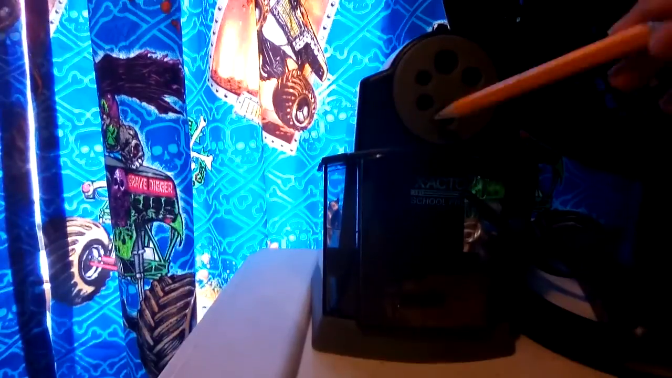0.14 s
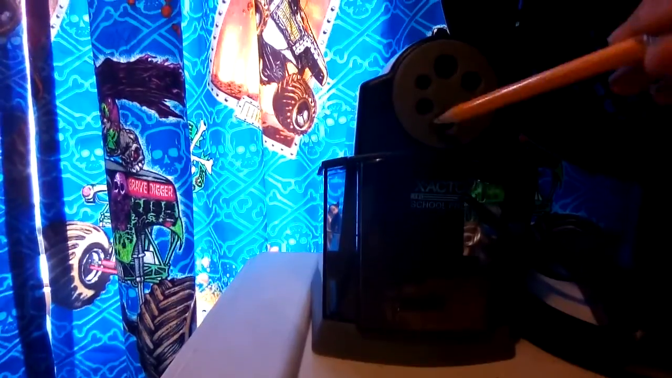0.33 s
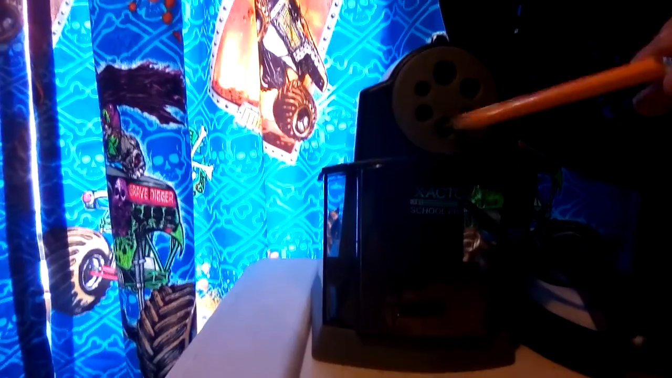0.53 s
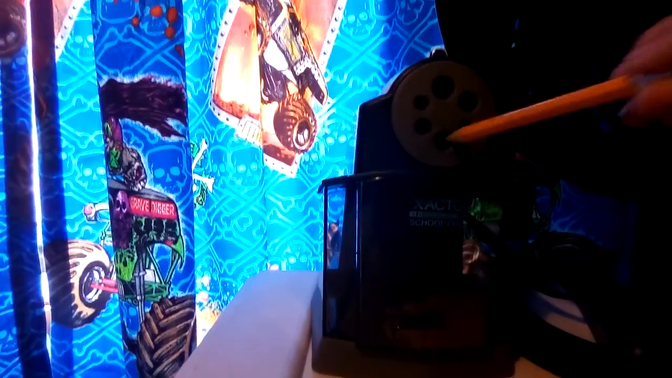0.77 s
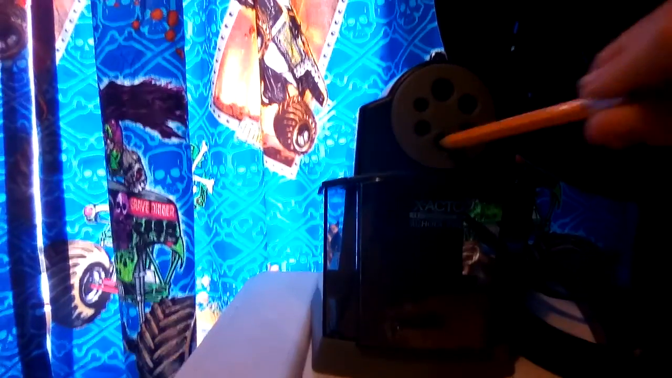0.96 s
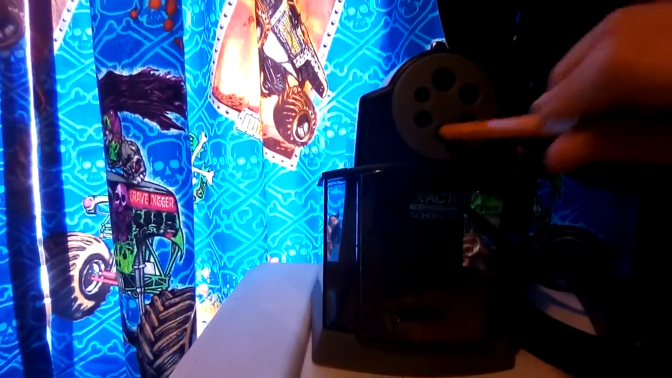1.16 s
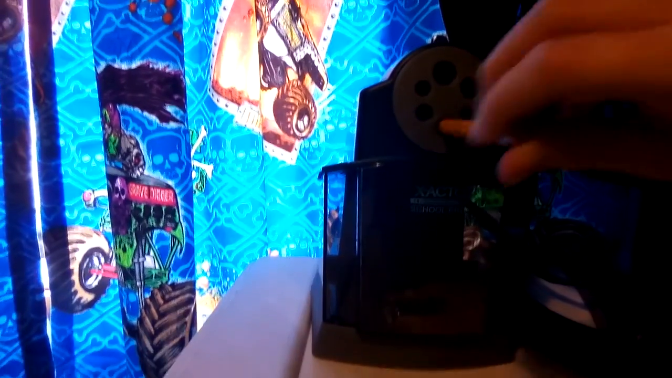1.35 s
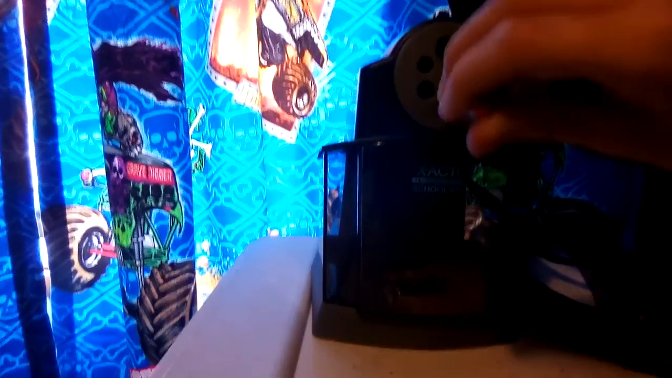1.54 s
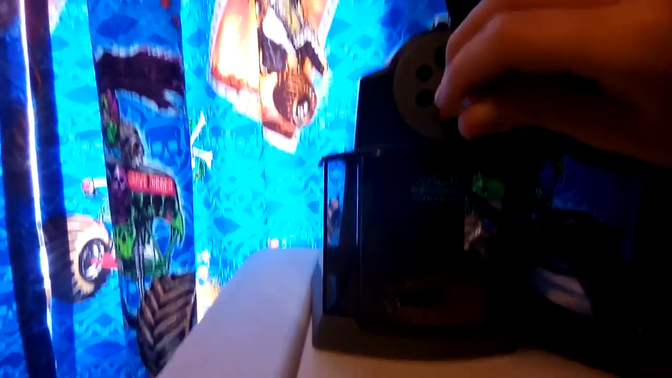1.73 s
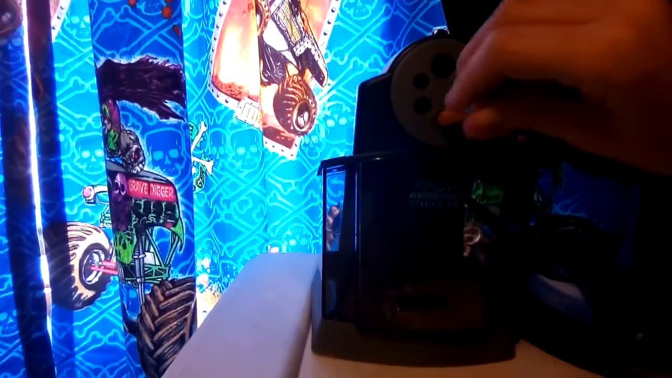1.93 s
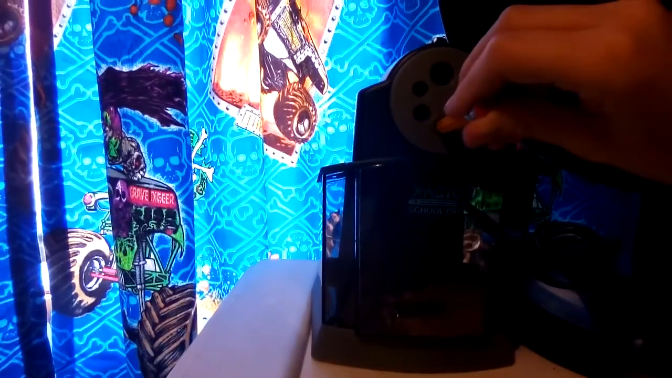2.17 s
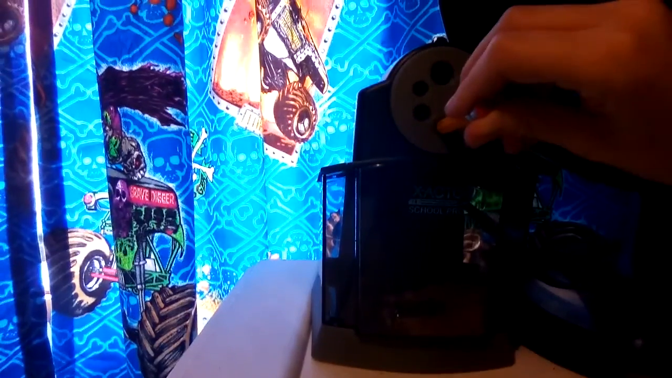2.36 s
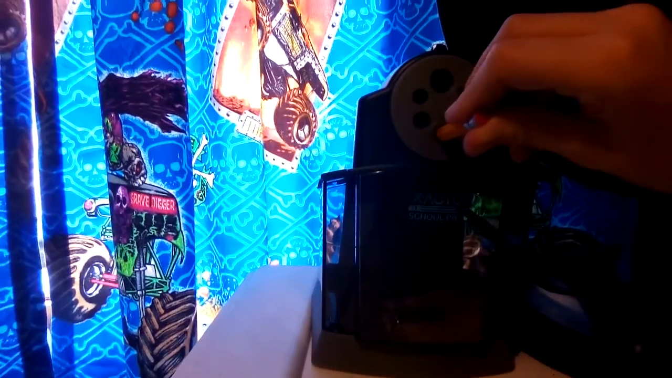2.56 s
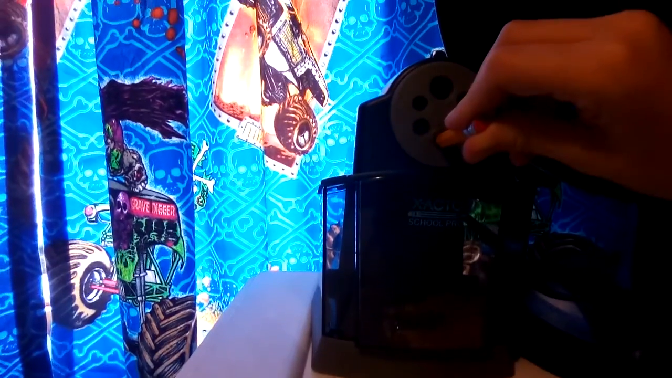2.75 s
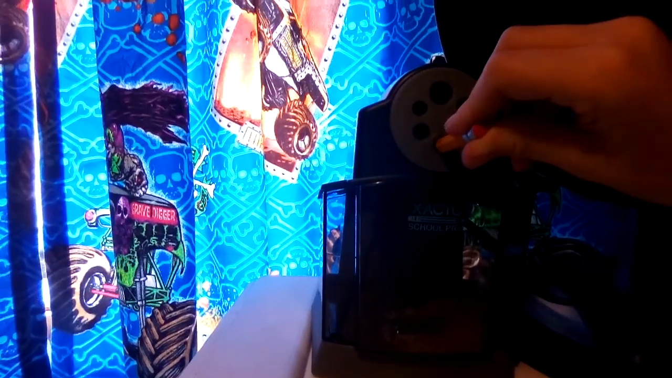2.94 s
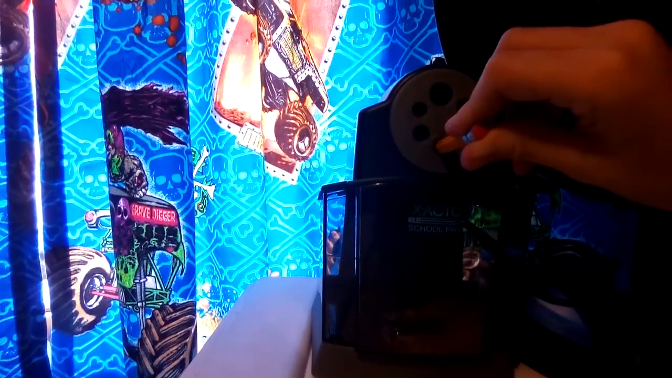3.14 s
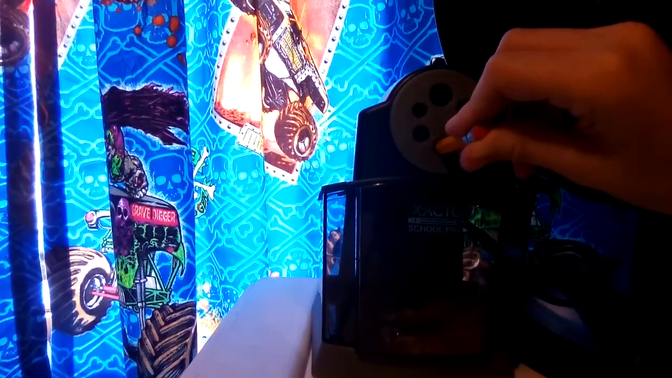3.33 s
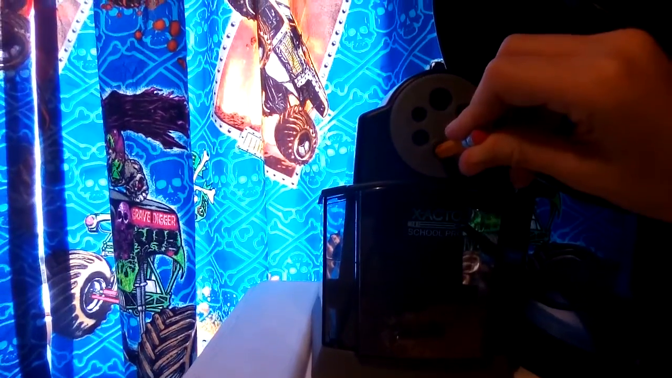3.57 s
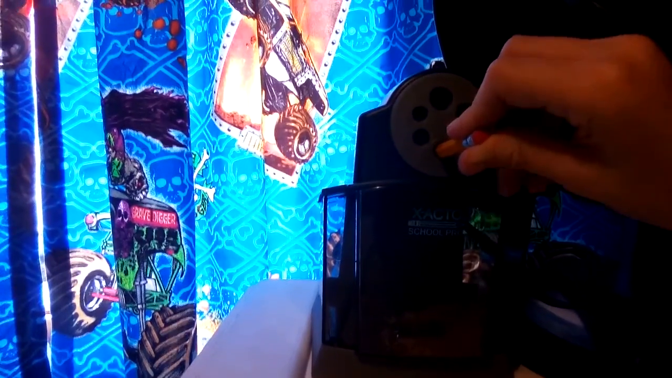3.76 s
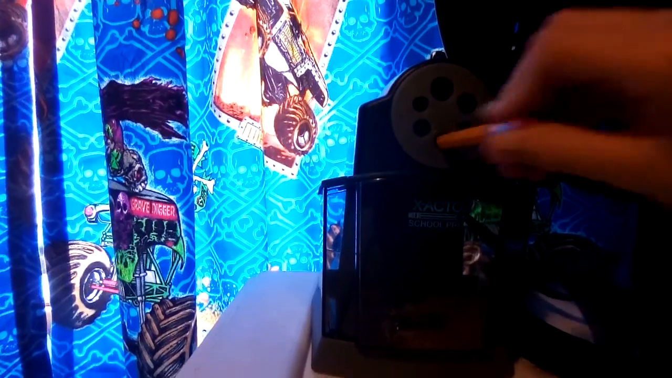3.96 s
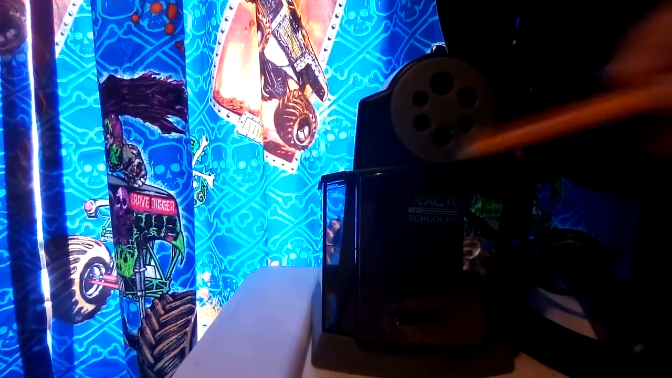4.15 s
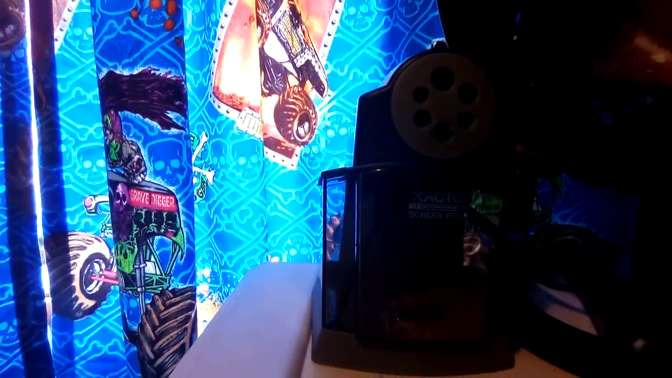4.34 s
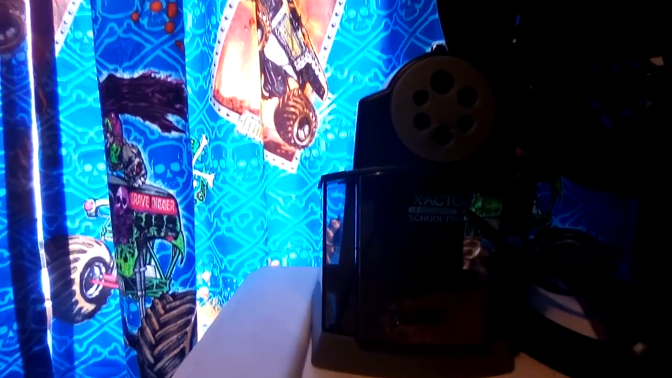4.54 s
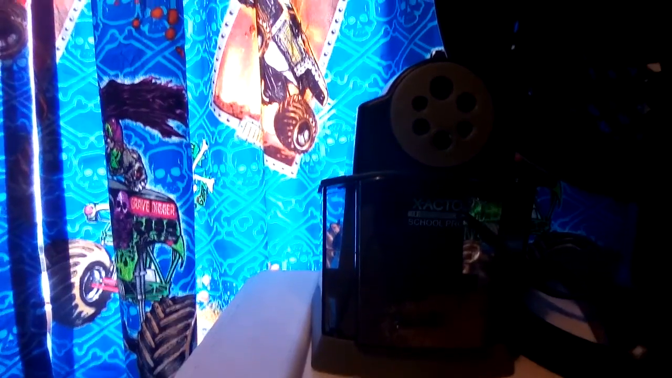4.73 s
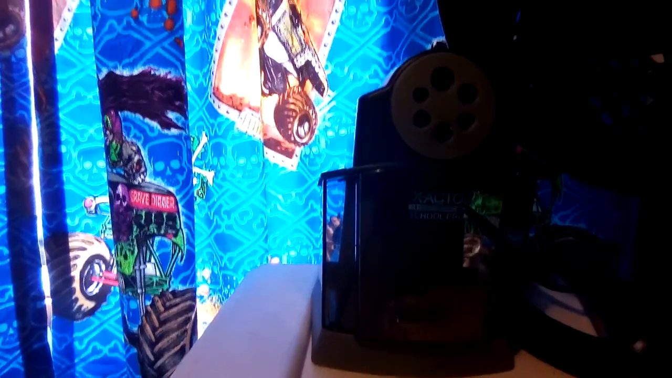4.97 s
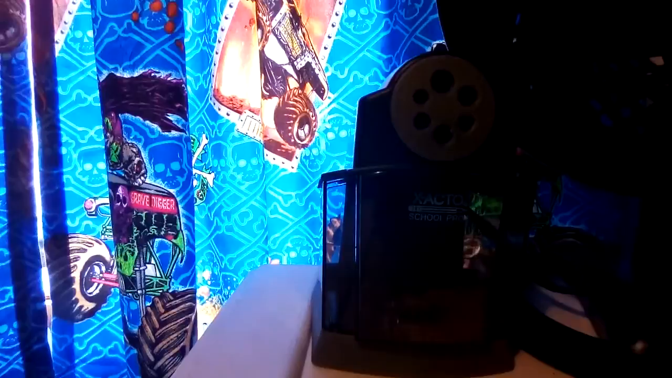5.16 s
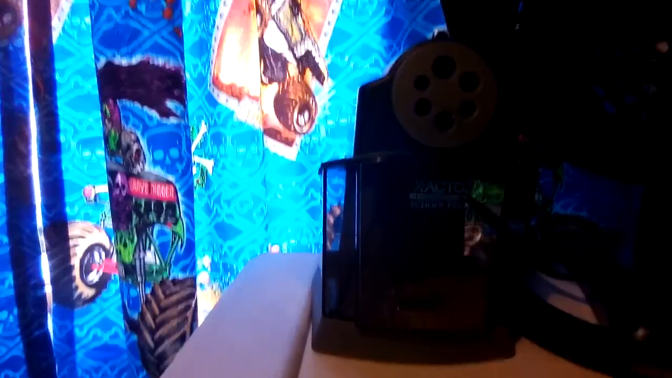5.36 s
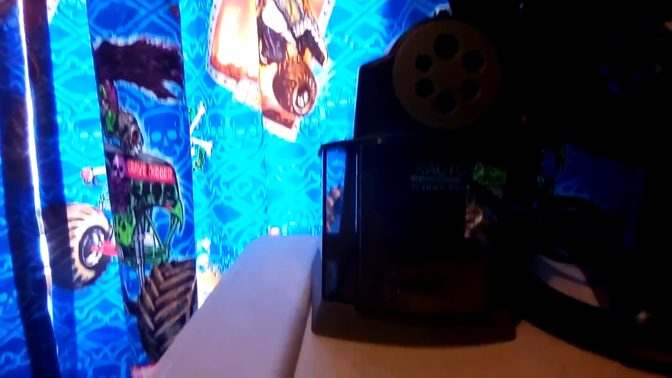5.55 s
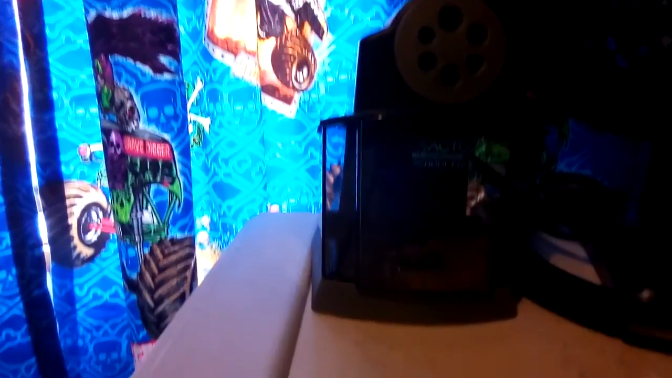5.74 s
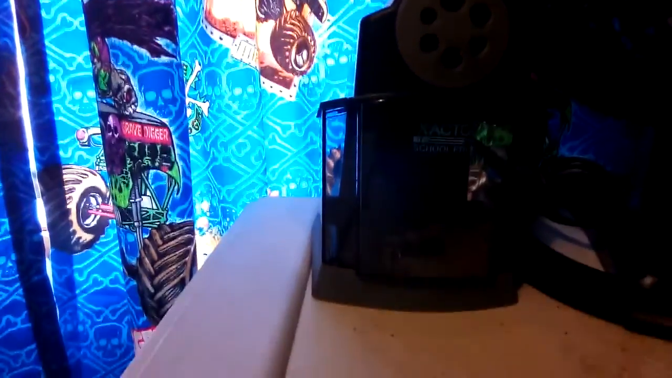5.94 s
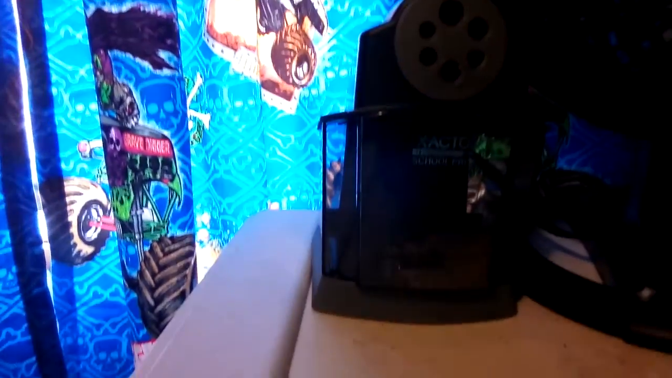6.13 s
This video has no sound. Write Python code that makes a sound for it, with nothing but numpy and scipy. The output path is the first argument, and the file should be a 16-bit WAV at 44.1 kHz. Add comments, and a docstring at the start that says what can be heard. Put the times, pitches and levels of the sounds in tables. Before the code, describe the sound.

In a small quiet room, close to a slightly dull microphone, a pencil knocks hard plastic at once, scuffs softly, then taps again around 0.3 to 0.5 seconds, ending with a sharp bright snap. A faint hoarse squeak rises near 0.65, followed by a tiny chirp and dull knocks by 0.9. Dry rubbing comes at 1.2 to 1.4, then the pencil slides in and a switch clicks at 1.75. The electric sharpener bursts into hum, rattle and hissing wood shaving, with crunchy surging bites until about 2.4. It then runs lighter, a buzzing grind throbbing about eight times a second. Scrapes at 3.7 to 4.0 mark the pencil leaving. Power cuts at 4.0; hollow gear clunks and low rumble coast down, slowing and weakening. A heavier knock lands at 5.4, and a small click and knock at 6.1.

```python
"""Close to a small microphone in a small quiet room, a pencil taps an electric sharpener's plastic face.
Filtered bursts make the taps; coloured grains and tones make the pencil rub, squeak and chirp. It slides in
and trips the switch: hum tones throb, random gear contacts ring the housing, the cutter digs and shaves.
The point scrapes the cutter as it leaves; the power drops and the clunking gears coast almost to rest."""
import sys
import numpy as np
from scipy import signal
from scipy.fft import rfft, irfft
from scipy.io import wavfile
from scipy.ndimage import uniform_filter1d

SR = 44100
rng = np.random.default_rng(int(sys.argv[2]) if len(sys.argv) > 2 else 0)


def file_out(sig):
    """Save sig as 16-bit WAV at sys.argv[1]."""
    # one column per channel
    cols = np.atleast_2d(sig).T
    # limit, then scale
    lim = np.clip(cols, -1, 1)
    pcm = np.round(lim * 32767).astype(np.int16)
    wavfile.write(sys.argv[1], SR, pcm)


N = 273420

# What the machine does from each moment on: spinning up, heavy cut of the blunt pencil,
# light cut when nearly sharp, pencil drawn back, power off and coasting.
# Columns: start_s, rattle_db, grind_db, shaving_db, hum_db, shake_db
STAGES = [(1.747, -31, -37, -42, -44, -11), (1.812, -24, -28.5, -20.5, -31, -6),
          (2.418, -27, -27.5, -30.5, -27, 2), (3.745, -26, -29.5, -43.5, -26, 5),
          (3.986, -28.5, -38, -99, -99, -29.5)]
# Resonances of the housing. Columns: centre_hz, width_hz, lift_db (over the broad response)
HOUSING_MODES = [(318, 70, 13), (410.7, 24, 3.5), (470.4, 30, 8), (505, 29, 5.5), (611, 17, 8),
                 (1007, 130, 5.5), (1447, 275, 11), (2013, 240, 4), (2382, 120, 2.5), (2830, 56, -5.5),
                 (3610, 260, 5), (5400, 500, 10.5)]
# Resonances of the plastic face. Columns: centre_hz, width_hz, lift_db (over the broad response)
FACE_MODES = [(312, 33, 12.5), (504.4, 49, 16.5), (855, 260, 16), (1447, 200, 8), (1940, 160, 12),
              (2600, 530, 10.5), (3600, 440, 13), (4370, 190, -0.5), (5140, 220, 8), (6600, 340, 12)]

CARRIER_HZ = 8.0        # turns of the cutter carrier a second
CARRIER_TOP_S = 2.62    # a moment when the hum throbs loudest
HUM_HZ = 120.0


def from_db(db):
    """Decibels to gain."""
    return 10 ** (np.asarray(db) / 20)


def rms_one(x):
    """Scale to unit power."""
    return x / np.sqrt(np.mean(x ** 2) + 1e-20)


def in_time(rows):
    """Interpolate the columns over time, with -150 outside the table to silence a level."""
    s, *columns = np.transpose(rows)
    t = np.arange(N) / SR
    return [np.interp(t, s, column, left=-150, right=-150) for column in columns]


def drift(rate_hz):
    """Slow random wander of unit rms: noise through two equal one-pole lowpasses."""
    r = np.exp(-2 * np.pi * rate_hz / SR)
    noise = rng.standard_normal(N + SR)
    settled = signal.lfilter([1], [1, -2 * r, r * r], noise)[SR:]
    return rms_one(settled)


def random_signs():
    """A random plus or minus one at each sample."""
    return rng.choice([-1., 1.], N)


def colour(x, spectrum, peaks=()):
    """Causal (minimum-phase) filter with this spectrum, raised at each resonance."""
    hz = np.maximum(np.arange(4097) * SR / 8192, 1)
    points = np.array(spectrum)
    db = np.interp(np.log(hz), np.log(points[:, 0]), points[:, 1])
    for centre_hz, width_hz, lift_db in peaks:
        db = db + lift_db / (1 + (2 * (hz - centre_hz) / width_hz) ** 2)
    # Folding the cepstrum forward in time makes the filter minimum-phase.
    cepstrum = irfft(np.log(from_db(np.maximum(db, -120))))
    cepstrum[1:4096] *= 2
    cepstrum[4097:] = 0
    response = irfft(np.exp(rfft(cepstrum)))
    return signal.fftconvolve(x, response)[:N]


def grains(per_s, spread_db):
    """Random contacts of uneven size and either sign."""
    lift_db = spread_db * np.minimum(rng.exponential(1, N), 4)
    sizes = from_db(lift_db) * rng.standard_normal(N)
    return sizes * (rng.random(N) < per_s / SR)


def bursts(s, db, rise_s, t60_s):
    """Level outline of events: a rounded rise, an exponential fall."""
    clicks = np.full(N, 1e-18)
    clicks[np.round(s * SR).astype(int)] = from_db(db)
    fall = from_db(-60 / (t60_s * SR))
    rise = np.exp(-1 / (max(rise_s, 1e-5) * SR))
    return signal.lfilter([1 - rise], np.convolve([1, -fall], [1, -rise]), clicks)


def stage_gain(column, change_s=0.0027):
    """Gain of one layer, gliding to each stage's level; silent before the switch."""
    rows = np.array(STAGES)
    stage = np.searchsorted(rows[:, 0], np.arange(N) / SR)
    held = np.append(0, from_db(rows[:, column]))[stage]
    r = np.exp(-1 / (change_s * SR))    # change_s is a time constant
    return signal.lfilter([1 - r], [1, -r], held)


def bites(column, before_s, after_s):
    """Decibel outline as the cutter digs into blunt wood and breaks free: builds up, then dies away."""
    # Columns: moment_s, grind_swell_db, hum_sag_db (negative where the hum swells)
    bite_rows = np.array([(1.952, 7, 4), (2.043, 6, 27), (2.172, 5, 7), (2.269, 0.5, 4), (2.32, 7.5, -6),
                          (2.41, 3.5, 4.5)])
    since = np.arange(N)[:, None] / SR - bite_rows[:, 0]
    outline = np.exp(-np.abs(since) / np.where(since < 0, before_s, after_s))
    return outline @ bite_rows[:, column]


def cutter_swell_db():
    """Rise of the cutting load in each bite: a slow dig, a faster break free."""
    return bites(column=1, before_s=0.026, after_s=0.011)


def powered():
    """True while the motor has power, from the first stage to the last."""
    t = np.arange(N) / SR
    return (t > STAGES[0][0]) & (t < STAGES[-1][0])


def carrier_turn(lag_s=0.):
    """One cosine swing per turn of the cutter carrier."""
    t = np.arange(N) / SR
    return np.cos(2 * np.pi * CARRIER_HZ * (t - CARRIER_TOP_S - lag_s))


def coasting_speed():
    """Relative speed: full until the power goes, then falling evenly toward a standstill."""
    t, off_s, standstill_s = np.arange(N) / SR, STAGES[-1][0], 6.306
    return np.clip((standstill_s - t) / (standstill_s - off_s), .01, 1)


def room_tone():
    """Steady coloured background noise with a slight random waver."""
    # Columns: hz, db_per_hz (relative)
    tone_colour = [(20, -22), (90, -15.5), (123, -5), (150, -18), (230, -23.5), (375, -24), (820, -29.5),
                   (1390, -35.5), (4000, -39.5), (6300, -42), (9000, -15.5), (12000, -32.5), (16000, -27)]
    noise = rng.standard_normal(N) * from_db(1.1 * drift(9.1))
    return from_db(-48) * rms_one(colour(noise, tone_colour))


def room(x):
    """A dying noise tail after a 4 ms gap, dull in the treble."""
    t, t60_s = np.arange(SR // 2) / SR, 0.15
    tail = rng.standard_normal(len(t)) * from_db(-60 * t / t60_s) * (t > .004)
    tail = signal.lfilter([1], [1, -.4], tail)
    return signal.fftconvolve(x, tail / np.sqrt(np.sum(tail ** 2)))[:N]


def coasting_rumble():
    """The coasting rotor rumbles through the desk: low-coloured grains fading with speed."""
    # Columns: hz, db_per_hz (relative)
    rumble_colour = [(30, -29.5), (90, -4.5), (170, 0), (260, -10), (500, -43.5)]
    coasting = np.arange(N) / SR > STAGES[-1][0]
    level = from_db(-49) * coasting_speed() ** .35 * coasting
    return level * rms_one(colour(grains(3000., 0.83), rumble_colour))


def motor():
    """Tones on 120 Hz and gear whines throb with the carrier, shift in the bites; shafts shake slowly."""
    # Hum tones; the broken multiples are gear whines. Columns: multiple (of HUM_HZ), level_db (relative)
    hum_tones = [(1, 3.5), (2, -10.5), (3, -8), (4, -22), (5.21, -17), (8, -10), (12.62, -10.5)]
    # Unbalanced shafts shaking the desk. Columns: hz, rms_db (before the stage level)
    shaft_tones = [(20, -47), (30, -51), (70, -56)]
    t, field_change_s = np.arange(N) / SR, 0.023
    turn = carrier_turn()
    throb_db = 2.1 * turn - bites(column=2, before_s=0.013, after_s=0.013)
    slip_rad = .22 * turn    # the hum slips back at each throb
    hum = 0
    for multiple, db in hum_tones:
        phase = 2 * np.pi * (multiple * HUM_HZ * t + rng.random()) - slip_rad
        hum = hum + from_db(db + 0.66 * drift(4.6)) * np.sin(phase)
    shake = 0
    for hz, db in shaft_tones:
        shake = shake + np.sqrt(2) * from_db(db) * np.sin(2 * np.pi * (hz * t + rng.random()))
    hum = stage_gain(column=4, change_s=field_change_s) * from_db(throb_db) * hum
    return hum + stage_gain(column=5, change_s=field_change_s) * shake


def squeak():
    """A faint hoarse gliding tone, with an unsteady upper tone at a fixed pitch."""
    # Columns: moment_s, pitch_hz, level_db
    glide = [(.6, 1750, -75), (.63, 1780, -62), (.655, 1860, -61), (.7, 2030, -61), (.72, 2100, -78)]
    # Columns: pitch_hz, level_db (over the squeak)
    upper_hz, upper_db = (4400, -5)
    hz, db = in_time(glide)
    grip = .5 + drift(70.)    # unsteady grip makes it hoarse
    tone = grip * np.sin(2 * np.pi * np.cumsum(hz) / SR)
    upper = drift(120.) * np.sin(2 * np.pi * upper_hz * np.arange(N) / SR)
    return from_db(db) * (tone + from_db(upper_db) * upper)


def chirp():
    """A short chirp of two unsteady decaying tones."""
    # Columns: pitch_hz, level_db, t60_s
    chirp_tones = [(2000, -43, .17), (4000, -34, .09)]
    t, start_s = np.arange(N) / SR, np.array([.757])
    out = 0
    for hz, db, t60_s in chirp_tones:
        unsteady = 1 + .5 * drift(120.)
        out = out + bursts(start_s, db, .002, t60_s) * unsteady * np.sin(2 * np.pi * hz * t)
    return out


def rubbing():
    """Wood slides on plastic in dense tiny slips, ringing the face; a soft scuff lies beneath."""
    # Strokes on the face and into the hole, one table each. Columns: moment_s, level_db
    strokes = [
        [(.26, -86), (.3, -60), (.355, -59)],
        [(1.19, -77), (1.22, -52.5), (1.33, -51.5), (1.4, -56.5), (1.44, -66)],
        [(1.6, -75), (1.66, -57), (1.735, -53)],
    ]
    # Columns: hz, db_per_hz (relative)
    rub_colour = [(250, -17.5), (500, -20), (800, -24), (1300, -25.5), (3600, -31), (6000, -25),
                  (16000, -35)]
    # Columns: moment_s, level_db
    scuff_level = [(.08, -68), (.14, -61.5), (.3, -57.5), (.62, -61), (.7, -68)]
    # Columns: hz, db_per_hz (relative)
    scuff_colour = [(500, -30), (1000, -4.5), (1250, 1), (1450, -6.5), (1900, -31), (4300, -18.5),
                    (7000, -35)]
    slips = grains(9000., 1.) * from_db(1.5 * drift(40.))
    slips = rms_one(colour(slips, rub_colour, FACE_MODES))
    rub = slips * sum(from_db(in_time(rows)[0]) for rows in strokes)
    scuff = rms_one(colour(grains(7700.0, 0.64), scuff_colour))
    return rub + from_db(in_time(scuff_level)[0]) * scuff


def clacks():
    """Dull knocks: short noise bursts that ring the housing."""
    # Columns: moment_s, level_db (before colouring)
    knocks = [(0.754, -38), (0.908, -35), (5.392, -32.5), (5.405, -28), (5.414, -19.5), (6.131, -30)]
    # Columns: hz, response_db
    knock_colour = [(250, -15.5), (550, 10), (1000, -13), (2000, -3.5), (3500, -10.5), (16000, -45)]
    s, db = np.transpose(knocks)
    return colour(bursts(s, db, 0.00011, 0.083) * random_signs(), knock_colour, HOUSING_MODES)


def snaps():
    """Hard, bright snaps of noise with a hissing tail."""
    # Columns: moment_s, level_db (before colouring)
    snap_rows = [(0.4788, -21), (1.745, -26.5), (6.136, -56)]
    # Columns: hz, response_db
    snap_colour = [(1500, -17), (2900, -6), (3700, 7), (5200, 16.5), (6000, 2), (10000, 22), (12000, 15.5),
                   (16000, 14)]
    s, db = np.transpose(snap_rows)
    level = bursts(s, db, .00003, .011) + bursts(s, db - 20.5, .003, 0.17)
    return colour(level * random_signs(), snap_colour)


def taps():
    """Contacts on the plastic chatter briefly and ring the face, low with the push, high with the tick."""
    # Taps and clicks. Columns: moment_s, body_db, tick_db (before colouring)
    contacts = [(.040, -12, -36.5), (0.27, -38.5, -77), (0.313, -31, -69), (0.333, -28, -52),
                (.364, -15, -29), (0.467, -28.5, -53), (0.481, -16.5, -26), (1.457, -58, -52.5),
                (1.643, -56, -55), (1.743, -31, -29), (2.391, -31, -38), (3.976, -32, -27),
                (4.257, -35, -36), (4.365, -39, -40.5), (5.055, -52, -45), (6.134, -40, -39)]
    # Columns: hz, response_db
    body_colour = [(120, -39.5), (300, -11), (800, -1), (2200, -13.5), (3500, -27)]
    # Columns: hz, response_db
    tick_colour = [(700, -33), (1600, -2.5), (4000, 15), (7000, 7), (9000, 20.5), (12500, 1), (16000, 10)]
    s, body_db, tick_db = np.transpose(contacts)
    push = bursts(s, body_db, 0.00034, 0.044) * (0.91 + random_signs())
    tick = bursts(s, tick_db, .00003, 0.012) * (0.91 + random_signs())
    return colour(push, body_colour, FACE_MODES) + colour(tick, tick_colour, FACE_MODES)


def shaving(chatter_db):
    """The cutter peels wood in dense random hiss, with streaky surges and scrapes of the leaving point."""
    # Columns: hz, db_per_hz (relative)
    shave_colour = [(2000, -15.5), (4000, 4.5), (4800, -6.5), (5400, 6), (7000, 3), (16000, 8.5)]
    # The point brushes the cutter on its way out. Columns: moment_s, hiss_db
    scrapes = [(3.72, -26.5), (3.794, -20.5), (3.971, -17.5)]
    t = np.arange(N) / SR
    throb = carrier_turn(lag_s=0.045) * powered()
    level = stage_gain(column=3) * from_db(0.12 * cutter_swell_db() + throb)
    level = level + bursts(*np.transpose(scrapes), 0.0043, 0.11)
    pulse = np.cos(2 * np.pi * HUM_HZ * t) * powered()
    hiss = grains(14000.0, 4.4) * from_db(chatter_db + 2.0 * drift(29.0) + 0.64 * pulse)
    # Frequent random surges, about thirty a second, make the hiss streaky.
    fall = from_db(-60 / (0.086 * SR))
    surges = signal.lfilter([1], [1, -fall], np.abs(grains(30., 0.72)))
    return level * rms_one(colour(hiss * (1 + 1.2 * surges), shave_colour))


def gear_train(chatter_db):
    """Tooth and blade contacts ring the housing; under power each field pulse presses them harder."""
    # Columns of these four: hz, db_per_hz (relative)
    rattle_colour = [(35, -64.5), (60, -19), (119, -4.5), (390, -9), (478, 1), (559, -5.5), (996, -5),
                     (1670, -48), (2500, -29.5), (3250, -85)]
    grind_colour = [(500, -15), (1000, -8.5), (1500, -5.5), (2200, 1), (3000, -8.5), (4500, -15.5),
                    (7000, -29.5), (16000, -22)]
    clatter_colour = [(500, -31.5), (900, 14), (1350, 8.5), (2200, -32)]
    clunk_colour = [(300, -43.5), (490, 17.5), (750, -48.5)]
    # Loose gears clunking as the train coasts. Columns: moment_s, boom_db, clatter_db
    clunks = [(4.002, -19, -29), (4.057, -45, -33), (4.093, -17.5, -26), (4.145, -17, -29.5),
              (4.222, -21, -28), (4.248, -20, -49), (4.292, -20.5, -28), (4.311, -25, -46.5),
              (4.339, -25.5, -37), (4.389, -24.5, -25.5), (4.438, -24, -40.5), (4.475, -18.5, -24.5),
              (4.515, -22.5, -36.5), (4.586, -27.5, -28.5), (4.617, -28.5, -45), (4.68, -20, -26),
              (4.72, -25, -40), (4.812, -27, -26), (4.878, -23.5, -39.5), (4.904, -25.5, -26.5),
              (5.011, -24.5, -33), (5.058, -32, -29.5), (5.182, -24, -31.5), (5.206, -22, -33),
              (5.245, -28, -38.5), (5.296, -22.5, -36), (5.343, -25.5, -34.5), (5.411, -28, -35),
              (5.515, -35, -38), (5.551, -29.5, -48), (5.584, -25.5, -38), (5.62, -32, -42),
              (5.646, -27.5, -42), (5.729, -30.5, -68), (5.782, -35, -68), (5.839, -26.5, -49),
              (5.927, -32.5, -67), (5.996, -27, -42.5)]
    t, speed, swell_db = np.arange(N) / SR, coasting_speed(), cutter_swell_db()
    throb_db = 0.5 * carrier_turn(lag_s=0.045) * powered()
    rattling = stage_gain(column=1) * speed ** 1.35 * from_db(0.83 * swell_db)
    grinding = stage_gain(column=2) * speed ** 2.17 * from_db(swell_db + throb_db)
    pulse = np.cos(2 * np.pi * HUM_HZ * t) * powered()
    teeth = grains(5000., 1.2) * from_db(chatter_db + 1.4 * pulse)
    blades = grains(5000., 0.68) * from_db(chatter_db + 2.0 * drift(47.0) + 0.64 * pulse)
    s, boom_db, clatter_db = np.transpose(clunks)
    jolts = bursts(s, clatter_db, 0.0075, 0.14)
    dulling = grinding / (rattling + 1e-9)    # slower clunks reach the upper modes less
    rattle = rattling * rms_one(colour(teeth, rattle_colour, HOUSING_MODES))
    grind = (grinding + 1.08 * jolts * dulling) * rms_one(colour(blades, grind_colour, HOUSING_MODES))
    clatter = jolts * rms_one(colour(teeth, clatter_colour))
    # The main housing mode, its swings evened out.
    boom = colour(grains(5000., 0.61), clunk_colour, HOUSING_MODES)
    boom = boom / (np.sqrt(uniform_filter1d(rms_one(boom) ** 2, size=600)) + 0.079)
    boom = bursts(s, boom_db, 0.0093, 0.098) * rms_one(boom)
    return rattle + grind + clatter + boom


def scene():
    """Sharpener and pencil with their room echo; the motor hum and shake have none."""
    chatter_db = .9 * drift(35.)    # backlash: teeth knock in clumps
    pencil = rubbing() + squeak() + chirp() + taps() + snaps()
    machine = coasting_rumble() + clacks() + shaving(chatter_db) + gear_train(chatter_db)
    near = pencil + machine
    return (near + from_db(-14.5) * room(near) + motor())[None]


def record(dry):
    """Add the room tone; a small microphone with a deep treble dip, then a steep top cut."""
    # Columns: hz, response_db
    microphone = [(20, -1), (6000, 2), (7000, -11.5), (8000, -36.5), (9200, -43.5), (10500, -34.5),
                  (11700, -22.5), (13200, -32), (14800, -17.5), (15700, -18.5)]
    sound = colour(dry[0] + room_tone(), microphone)
    top_cut = signal.cheby2(20, 70, 16160, fs=SR, output="sos")    # 70 dB down from 16160 Hz
    return signal.sosfilt(top_cut, sound)[None]


dry = scene()
out = record(dry)
file_out(out)
```